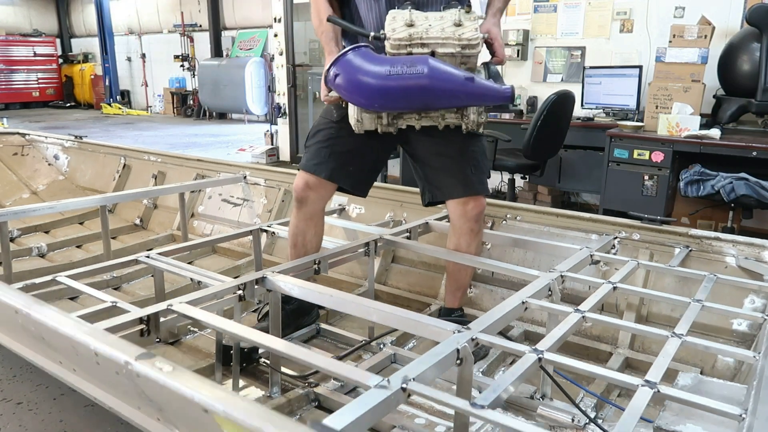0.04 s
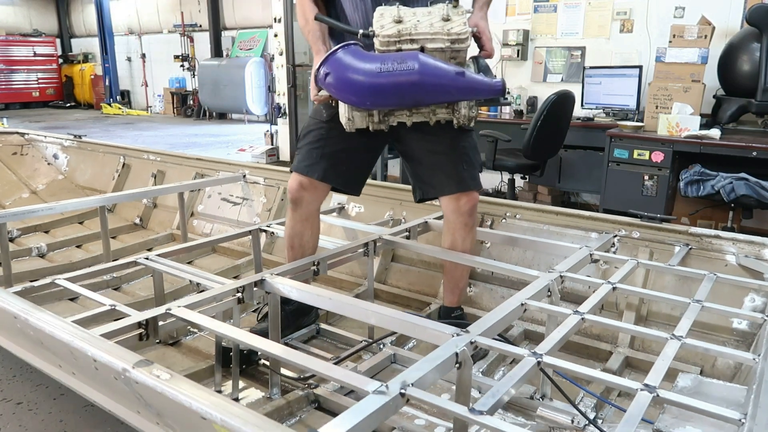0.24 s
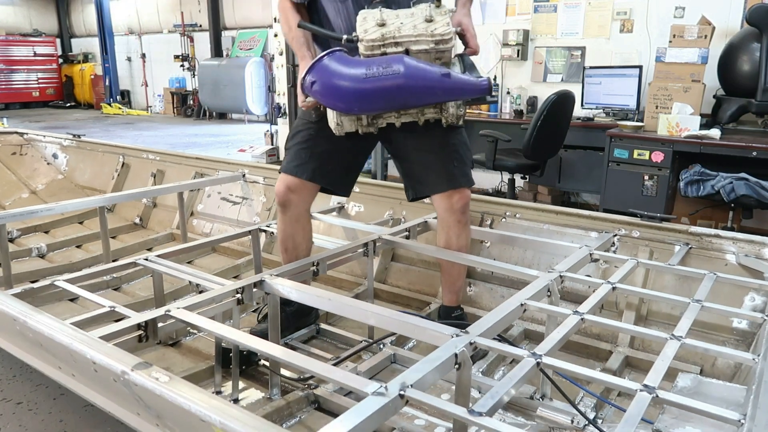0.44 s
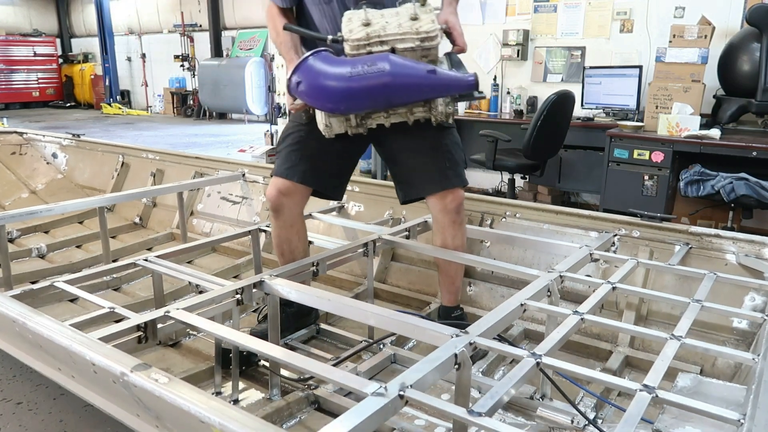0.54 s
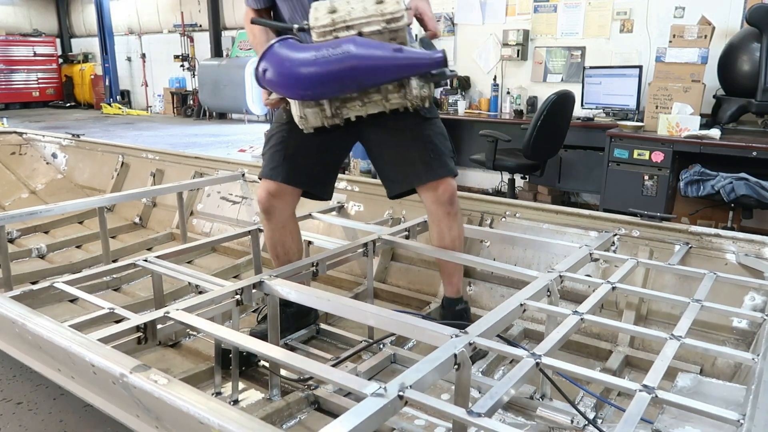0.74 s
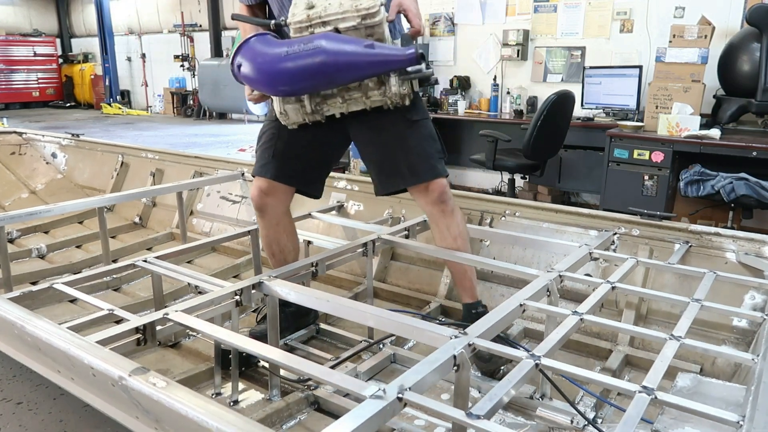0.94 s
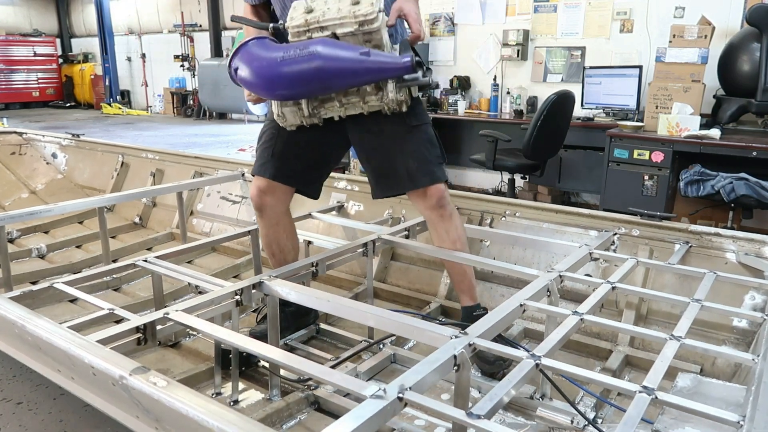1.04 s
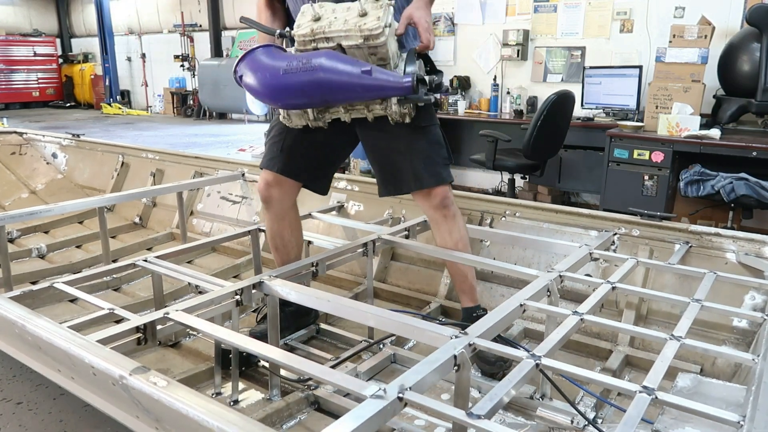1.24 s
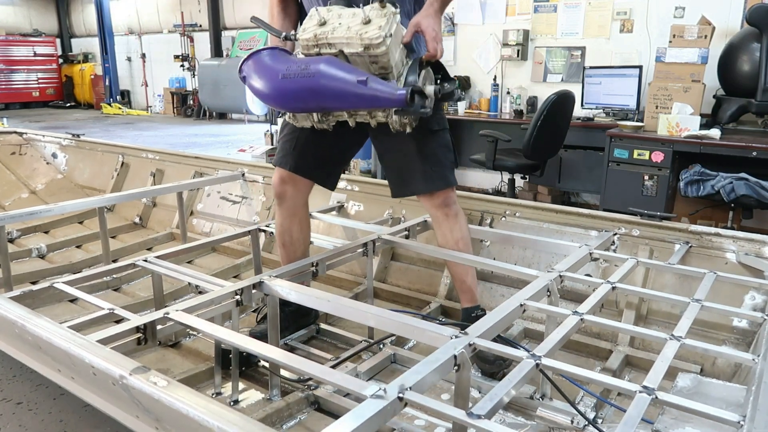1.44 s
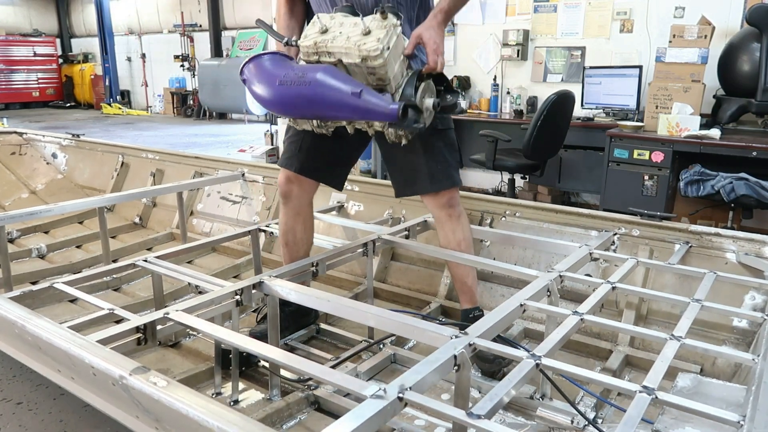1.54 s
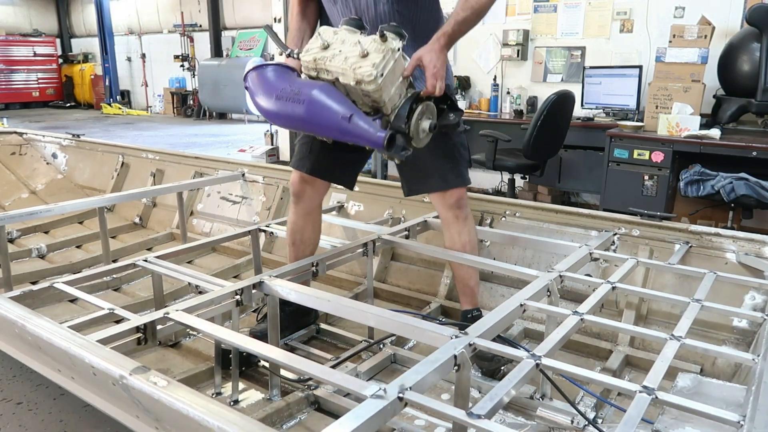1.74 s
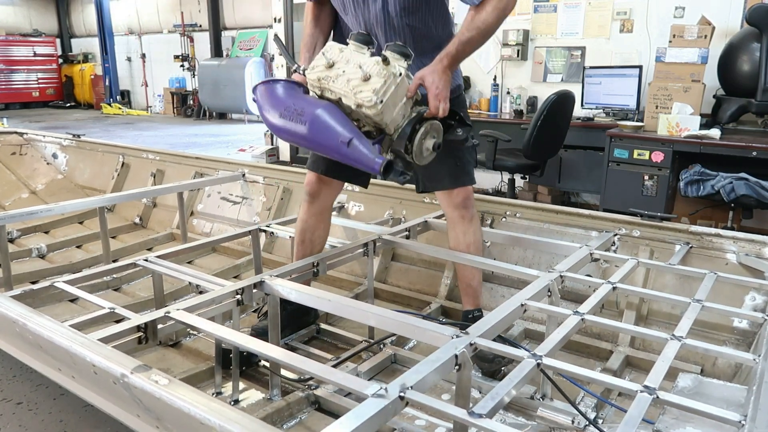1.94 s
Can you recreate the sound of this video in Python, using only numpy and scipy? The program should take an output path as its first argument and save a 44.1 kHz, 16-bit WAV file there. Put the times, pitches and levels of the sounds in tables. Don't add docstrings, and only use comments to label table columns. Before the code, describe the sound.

Two hollow metallic knocks ring through a bare metal boat hull, followed by low footstep thuds

```python
import sys
import numpy as np
from scipy import signal
from scipy.fft import rfft, irfft
from scipy.io import wavfile
from scipy.ndimage import uniform_filter1d

SR = 44100
rng = np.random.default_rng(int(sys.argv[2]) if len(sys.argv) > 2 else 0)


def wav_record(signal):
    frames = np.transpose(np.atleast_2d(signal))
    bounded = np.clip(frames, -1, 1)
    quanta = np.round(bounded * 32767).astype(np.int16)
    wavfile.write(sys.argv[1], SR, quanta)


def level_to_linear(level):
    exponent = np.asarray(level, float) / 20
    return 10 ** exponent


N = 88200


def evened(x):
    return x / np.sqrt(np.mean(x ** 2) + 1e-20)


def read(points, hz):
    table_hz, value = np.transpose(points)
    return np.interp(np.log(hz + 1), np.log(table_hz + 1), value)


def coloured(x, points, tilt_db=0):
    hz = np.fft.rfftfreq(len(x), 1 / SR)
    gain_db = read(points, hz) + tilt_db * np.log2((hz + 50) / 3000)
    return irfft(rfft(x) * level_to_linear(gain_db), len(x))


def drift(size, count=N):
    smoothed = uniform_filter1d(rng.standard_normal(count), size)
    return evened(uniform_filter1d(smoothed, size))


def add(mix, s, sound):
    part = mix[round(s * SR):][:len(sound)]
    part += sound[:len(part)]


def played(table, source):
    out = np.zeros(N)
    for s, *settings in table:
        add(out, s, source(*settings))
    return out


# (frequency [Hz], density [dB per Hz])
HUM = [(20, -20), (74, 1), (150, -8.5), (350, -22), (1300, -25.5), (3000, -37), (6000, -49), (13800, -62)]
# (frequency [Hz], density [dB per Hz])
HUM_SIDE = [(20, -25), (156, -10), (400, -4), (2750, -13.5), (6000, -21.5), (9000, -26), (11000, -25),
            (13800, -29)]
# (frequency [Hz], level [dB rms], waver [Hz])
WHINES = [(2805, -58.5, 1), (3510, -71, 10), (13001, -83, 40)]
HUM_DB, HUM_SIDE_DB = -33.5, -54


def hum():
    mid = level_to_linear(HUM_DB) * evened(coloured(rng.standard_normal(N), HUM))
    side = level_to_linear(HUM_SIDE_DB) * evened(coloured(rng.standard_normal(N), HUM_SIDE))
    whine = np.zeros(N)
    for hz, db, waver_hz in WHINES:
        turns = np.cumsum(hz + waver_hz * drift(size=300)) / SR
        whine += level_to_linear(db + 0.5 + 0.45 * drift(size=900)) * np.sin(2 * np.pi * turns)
    late_whine = np.roll(whine, shift=5)
    return np.array([mid + whine, side + 0.31 * late_whine]) * level_to_linear(0.4 * drift(size=1500))


# (time [s], rumble level [dB])
WEIGHT = [(0, -36), (.24, -37), (0.288, -18), (.55, -25), (0.898, -30), (.98, -21.5), (1.06, -28),
          (1.198, -27.5), (1.4, -35.5), (2, -43.5)]
# (frequency [Hz], density [dB per Hz])
HULL = [(24, -63), (40, -44), (57, -17), (83, -4), (145, -3.5), (251, -7.5), (319, -14), (843, -32.5),
        (1500, -35), (1950, -58), (3300, -120)]


def rumble():
    level_db = np.interp(np.arange(N) / SR, *np.transpose(WEIGHT))
    groan = evened(coloured(rng.standard_normal(N), HULL + [(4000, -80)]))
    return groan * level_to_linear(level_db + 0.96 * drift(size=700))


# (time [s], length [s],
# level [dB], tilt [dB per octave])
SCUFFS = [(0, 0.11, -47.5, 1.5), (.26, 0.16, -39, 2), (.5, 0.23, -44.5, 1.5), (.9, 0.3, -48.5, 2),
          (.25, 0.027, -23.5, -3.5), (.3, .055, -35, 1), (.395, 0.033, -47, 10), (.475, 0.037, -33, 0),
          (.515, 0.059, -31.5, 0), (.6, 0.057, -41.5, -0.5), (.69, 0.035, -45.5, 0.5), (.82, 0.055, -46, 2),
          (.885, 0.018, -51, 7), (.916, 0.011, -37, 5), (.928, 0.038, -31.5, -0.5), (1.0, 0.053, -45, 2.5),
          (1.11, 0.048, -46.5, 2.5), (1.7, 0.027, -56, 5.5)]
# (frequency [Hz], density [dB per Hz])
SOLE = [(240, -7.5), (400, -2.5), (988, -3.5), (1410, -11), (1840, -9), (7210, -33.5), (12300, -52),
        (13200, -48), (13800, -94)]
GRIT_PER_S, GRIT_SPREAD_DB = 5000, 1.5
SCUFF_T60 = .28


def scuff(length, db, tilt_db):
    t = np.arange(SR // 3) / SR
    grain_size = level_to_linear(GRIT_SPREAD_DB * np.minimum(rng.exponential(1, len(t)), 3))
    grains = grain_size * (rng.random(len(t)) < GRIT_PER_S / SR) * rng.standard_normal(len(t))
    grit = evened(coloured(grains, [(150, -35)] + SOLE, tilt_db))
    swell = np.sin(np.pi / 2 * np.minimum(t / (.3 * length), 1)) ** 2
    tail_db = -60 * np.maximum(t - length, 0) / SCUFF_T60
    easing_db = -3 * np.clip(t / length - .5, 0, 1)
    return grit * swell * level_to_linear(db + tail_db + easing_db)


# (time [s], frequency
# [Hz], level [dB], t60 [s])
RINGS = [(0, 2230, -47, 0.66), (0, 3200, -50.5, 0.35), (0, 1293, -45, 0.65), (.1, 1227, -42, 0.28),
         (.3, 10030, -60.5, 0.53), (.3, 13087, -62, 0.31), (.31, 4240, -53, .3), (.47, 6750, -48.5, 0.07),
         (.53, 5430, -56.5, 0.82), (.55, 3580, -51, 0.35), (.65, 9950, -67, 0.6), (.835, 857, -39.5, 0.9),
         (1.16, 5840, -59, 0.15)]
RING_RISE_S, RING_SPLIT_HZ, RING_FLUTTER_DB = .008, 28, 3


def ring(hz, db, t60):
    t = np.arange(SR // 2) / SR
    modes = 0.85 * sum(np.sin(2 * np.pi * (hz + k * RING_SPLIT_HZ) * t) for k in (0.4, 1, -2.4))
    level_db = db - 60 * t / t60 + RING_FLUTTER_DB * drift(size=200, count=len(t))
    return np.minimum(t / RING_RISE_S, 1) * level_to_linear(level_db) * modes


# (time [s], peak [dB], blow start [Hz], blow end [Hz], ring level [dB], brightness [dB per octave])
KNOCKS = [
    (.248, 1.5, 540, 1180, -17.5, 0),
    (.4781, 0, 500, 1130, -17.5, -5),
]
# (frequency [Hz], level [dB], t60 [s])
FRAME = [(508, -5.5, 0.26), (584.5, -3.5, 0.47), (673, -7, 0.64), (741, -6, 0.83), (781.4, -1.5, 0.4),
         (918, -4, 0.4), (941, -4, 0.4), (937, 6, 0.1), (1029, -5, 0.5), (1128, -0.5, 0.18),
         (1150, 2, 0.24), (1250, 5, 0.1), (1363, -4, 0.18), (2052, -13, 0.63)]
BLOW_S, BLOW_RISE_S, BLOW_FADE_DB = .009, .0032, -7
CLINK_HZ, CLINK_DB = 1936, -21.5
ECHO_S, ECHO_DB = .0245, -11.5
SPLIT = .055
LATE_DB, LATE_T60 = -26.5, 0.74


def knock(peak_db, low_hz, high_hz, ring_db, bright_db):
    t = np.arange(SR) / SR
    u = np.minimum(t / BLOW_S, 1)
    rise = np.minimum(t / BLOW_RISE_S, 1) ** 1.5
    shape = rise * np.cos(np.pi / 2 * u ** 3) * level_to_linear((BLOW_FADE_DB + bright_db) * u)
    angle = 2 * np.pi * np.cumsum(low_hz + (high_hz - low_hz) * u) / SR
    clink = level_to_linear(CLINK_DB) * np.sin(np.pi * u) ** 2 * np.sin(2 * np.pi * CLINK_HZ * t)
    blow = -shape * (np.sin(angle) + clink)
    blow = blow + level_to_linear(ECHO_DB) * np.roll(blow, round(ECHO_S * SR))

    hz, db, t60 = np.repeat(FRAME, repeats=11, axis=0).T[:, :, None]
    spread, phase = rng.uniform(-1.01, 1, (2, len(hz), 1))
    db = db + bright_db * np.log2(hz / 800)
    decay = level_to_linear(db - 60 * t / t60) + level_to_linear(db + LATE_DB - 60 * t / LATE_T60)
    modes = (decay * np.sin(2 * np.pi * hz * (1 + SPLIT * spread) * t + np.pi * phase)).sum(0)
    tube = u ** 4 * modes / np.sqrt(np.mean(modes[:2000] ** 2))
    return level_to_linear(peak_db) * blow + level_to_linear(ring_db) * tube


# (time [s], level [dB], frequency [Hz], length [s])
THUDS = [(.25, -20.5, 304, 0.032), (.27, -19, 251, 0.023), (.268, -15.5, 133.4, .14),
         (.33, -28, 333, 0.046), (.345, -43, 197, 0.068), (.39, -23.5, 108.2, 0.18), (.43, -36, 180, 0.026),
         (.475, -20, 158, 0.033), (.5, -19, 120.5, 0.046), (.58, -22.5, 86, 0.082),
         (.6, -29.5, 240.4, 0.081), (.62, -26.5, 191.7, 0.15), (.69, -21, 158, 0.047),
         (.7, -26.5, 245.3, 0.056), (.76, -23.5, 105, 0.076), (.8, -22, 138.3, 0.063),
         (.82, -30, 211.6, 0.15), (.93, -23.5, 137.3, .11), (.93, -22.5, 200.5, 0.074),
         (.93, -34, 400, 0.049), (1.0, -30, 310.4, 0.071), (1.07, -26, 198.8, 0.14),
         (1.1, -21.5, 150.4, 0.081), (1.19, -29, 157, .09), (1.2, -34, 258.5, 0.08),
         (1.47, -27, 151, 0.035), (1.51, -28.5, 99.2, 0.069), (1.79, -36, 159.4, 0.12)]
WOBBLE = 0.039
THUD_SKEW = 0.48


def thud(db, hz, length):
    t = np.arange(SR // 4) / SR
    turns = np.cumsum(hz * (1 + WOBBLE * drift(size=400, count=len(t)))) / SR
    swell = np.sin(np.pi * np.minimum(t / (1.35 * length), 1) ** THUD_SKEW)
    return swell * level_to_linear(db) * np.sin(2 * np.pi * turns)


def tail(x, decays, stretch=1):
    taps = np.zeros(SR)
    at = np.arange(40, SR - 20, 20)
    taps[at + rng.integers(0, 20, len(at))] = rng.choice([-1., 1.], len(at))
    hz, t, z = signal.stft(taps, SR, nperseg=256)
    t60 = stretch * read(decays, hz)[:, None]
    taps = signal.istft(z * level_to_linear(-60 * t / t60), SR, nperseg=256)[1]
    return signal.fftconvolve(x, taps / np.linalg.norm(taps))[:N]


# (frequency [Hz], t60 [s])
SHOP = [(100, .4), (800, 0.85), (3000, 0.81), (10000, 0.43)]
# (frequency [Hz], side level [dB])
PORTS = [(60, -47.5), (250, -27.5), (1000, -23), (2000, -14), (4000, -7.5), (8000, 1), (13000, 6.5)]
SHOP_DB = -13


def scene():
    body = rumble() + played(RINGS, ring) + played(KNOCKS, knock) + played(THUDS, thud)
    near_mid = body + played(SCUFFS, scuff)
    near_side = tail(body, SHOP, stretch=0.17) + played(SCUFFS, scuff)
    mid, side = [v + level_to_linear(SHOP_DB) * tail(v, SHOP) for v in (near_mid, near_side)]
    mid, side = np.array([mid, coloured(side, PORTS)]) + hum()
    return np.array([mid + side, mid - side])


def band_limit(x):
    return signal.sosfilt(signal.butter(12, 13990, fs=SR, output="sos"), x)


def record(dry):
    edge = signal.firwin(255, 13650, window=("kaiser", 8), fs=SR)
    mix = signal.oaconvolve(dry, edge[None], "same")
    return band_limit(mix)


dry = scene()
out = record(dry)
wav_record(out)
```